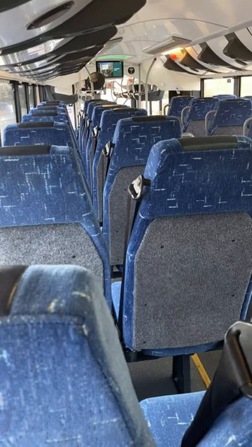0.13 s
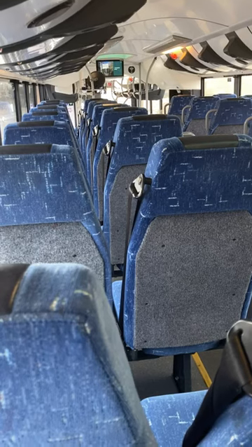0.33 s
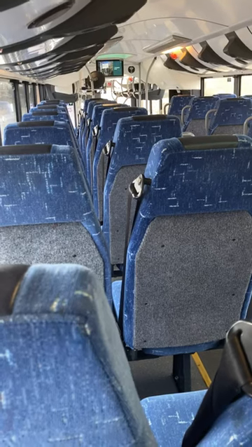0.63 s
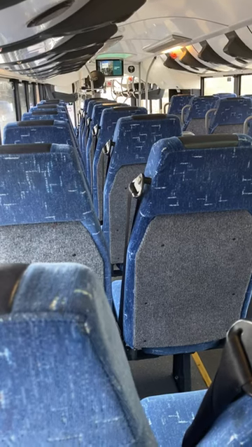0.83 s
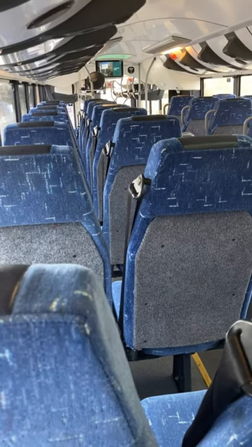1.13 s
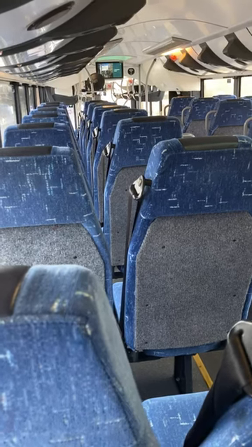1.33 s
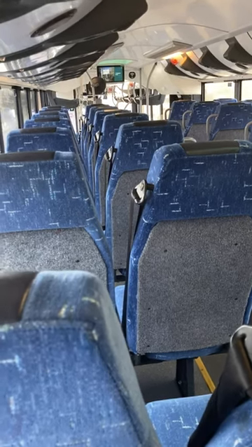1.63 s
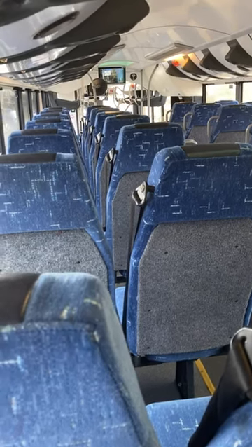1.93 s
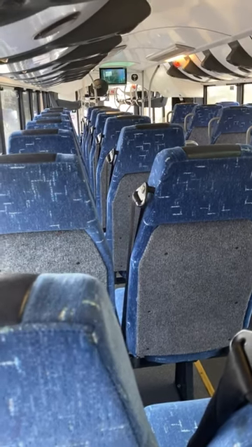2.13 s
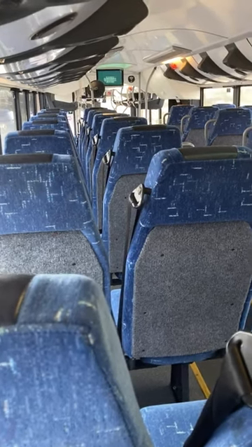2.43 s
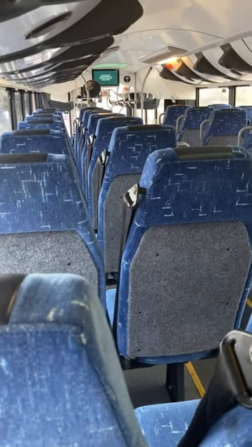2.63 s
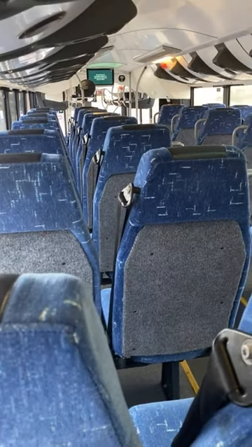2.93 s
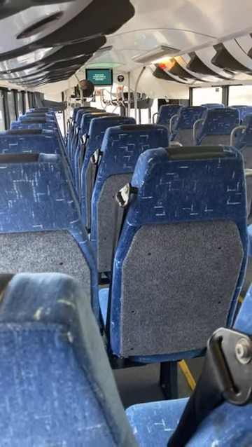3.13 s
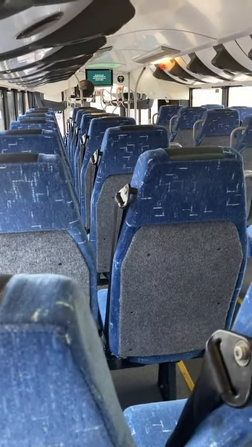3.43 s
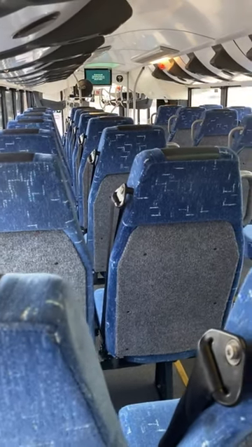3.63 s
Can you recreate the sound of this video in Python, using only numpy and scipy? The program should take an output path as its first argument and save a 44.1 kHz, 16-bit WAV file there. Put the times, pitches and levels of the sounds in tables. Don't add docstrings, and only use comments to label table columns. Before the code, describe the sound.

A low bus engine drone fills the cabin for about 3.8 seconds, its pitch dipping, rising around 1 second, then gradually sagging. A drive-line hum swells around 1.2 to 1.4 seconds, over continuous road rumble, soft hiss and very faint whine. Tiny buckle ticks appear early and from 2 seconds; bright metallic clacks cluster near 3.4 and 3.6. Bass leans left.

```python
import sys
import numpy as np
from scipy import signal
from scipy.fft import rfft, irfft, next_fast_len
from scipy.io import wavfile
from scipy.ndimage import uniform_filter1d

SR = 44100
rng = np.random.default_rng(int(sys.argv[2]) if len(sys.argv) > 2 else 0)


def decibels_to_gain(level_db):
    exponent = np.asarray(level_db, float) / 20
    return 10 ** exponent


def log_audio(samples):
    frames = np.atleast_2d(samples).T
    limited = np.clip(frames, -1, 1)
    pcm = np.round(limited * 32767).astype(np.int16)
    wavfile.write(sys.argv[1], SR, pcm)


N = 167139
T = np.arange(N) / SR
SIZE = next_fast_len(N + 4096)
HZ = np.maximum(np.arange(SIZE // 2 + 1) * SR / SIZE, 1)
GAP_LO_HZ, GAP_HI_HZ = 11150, 12500
# [f/Hz, width/Hz, gain/dB]
CABIN = [(55.3, 29, -3), (70.6, 13.1, 5.5), (91.9, 11, 3), (190, 11, 4), (251.4, 55.4, -4),
         (384.3, 13, 2.5), (520, 19, 3), (579, 16, 3.5), (960.5, 41, 7.5), (1150, 40, 6.5), (1338, 59, 6.5),
         (2630, 120, 3)]


def curve(table, col):
    a = np.array(table)
    return np.interp(T, a[:, 0], a[:, col])


def tone(table, hz, col=1):
    a = np.array(table)
    return np.interp(np.log(hz), np.log(a[:, 0]), a[:, col])


def peaks_db(table, hz):
    return sum(db / (1 + (2 * (hz - f) / w) ** 2) for f, w, db in table)


def walk(rate):
    k = int(SR / rate)
    held = np.repeat(rng.standard_normal(N // k + 1), k)
    return 1.322 * uniform_filter1d(uniform_filter1d(held, k), k)[:N]


def noise():
    return rfft(rng.standard_normal(SIZE))


def ports(shared, right_only, alike=None):
    # [f/Hz, left minus right/dB, likeness 0-1, left lead/rad]
    pair = [(60, 6, 0.88, 0.34), (130, 8, .995, -0.04), (178, 6, 0.97, 0.33), (254, 6.5, .88, -0.5),
            (346, 9.5, 0.6, -0.75), (500, 6.5, 0.6, -1.2), (690, 2.5, .72, -1.5), (1040, 2, .72, -2),
            (1390, 0, 0.2, -1.7), (1990, -0.2, 0, -2), (2840, 1.5, 0.69, -4), (4020, -0.5, 0.2, -4.5),
            (5600, 1, .5, -4), (9100, 0.5, 1, -5.5)]
    likeness = np.clip(tone(pair, HZ, col=2) if alike is None else alike, 0, 1)
    gain = decibels_to_gain(tone(pair, HZ, col=1) / 2)
    turn = np.exp(-1j * tone(pair, HZ, col=3))
    right = likeness * shared * turn + np.sqrt(1 - likeness ** 2) * right_only
    return np.array([shared * gain, right / gain])


def sine(hz, db):
    phase = 2 * np.pi * (np.cumsum(hz) / SR + rng.random())
    return np.sqrt(2) * decibels_to_gain(db + peaks_db(CABIN, hz)) * np.sin(phase)


def engine():
    # [t/s, firing f/Hz, exhaust boom level/dB, intake drone level/dB]
    revs = [(0, 100.6, -3.5, -16.5), (.2, 97.12, -5, 6.5), (.42, 93, -3.5, 8), (.68, 98.15, -5.5, 7),
            (.85, 102.2, -4, -6), (1.05, 105.7, -8.5, -4.5), (1.3, 102, -7, 2.5), (1.55, 98, -5, -7.5),
            (2.05, 97.13, 0, 5), (2.2, 95.73, 2.5, 5), (2.7, 94.1, 7, 2.5), (2.84, 92.12, -6.5, -4.5),
            (2.95, 94.5, 1, -7), (3.1, 94.5, 6.5, -2), (3.32, 90.5, -3, 3.5), (3.6, 93.2, 3.5, -2.5),
            (3.79, 93, 2, 9)]
    # [multiple of firing, level/dB, waver/dB, share of boom, share of drone]
    orders = [(.5, -35.5, 2.5, 0.084, -0.92), (.75, -38, 3.5, 0.36, 0.4), (1, -35.5, 4, 0.4, -0.14),
              (1.5, -48.5, 4.5, 0, 1), (2, -34, 1.13, 0.97, 0.27), (3, -41, 2, -0.18, -0.049),
              (4, -47, 2, 0.15, 1), (5, -59, 4.5, -0.92, -0.31), (6, -51, 2.5, 0.099, -0.11),
              (8, -61, 4, -1.2, -0.36)]
    firing = uniform_filter1d(curve(revs, col=1), size=4000) * (1 + 0.0021 * walk(12))
    boom, intake = curve(revs, col=2), curve(revs, col=3)
    out = 0
    for k, db, waver_db, boom_share, intake_share in orders:
        drift = 0.025 * walk(11) / (1 + k ** 3) + 0.0018 * (k > 2) * walk(20)
        level = db + boom_share * boom + intake_share * intake + waver_db * walk(8)
        out = out + sine(k * firing * (1 + drift), level)
    return out


def drive_line():
    # [t/s, f/Hz, level/dB]
    hum = [(0, 202, -38.5), (.45, 190, -45), (.9, 213, -45.5), (1.15, 229, -31.5), (1.38, 233, -29),
           (1.6, 220, -35), (1.9, 204, -37), (2.2, 197, -37), (2.7, 190, -48.5), (3.2, 180, -34),
           (3.5, 184, -37), (3.79, 186, -39)]
    hz = uniform_filter1d(curve(hum, col=1), size=4000)
    return sine(hz * (1 + 0.0029 * walk(8)), curve(hum, col=2) + 1.6 * walk(10))


def rattles():
    # [t/s, level/dB, length/s, brightest f/Hz, body level/dB]
    knocks = [(0.119, -63.5, 0.015, 7940, -2.5), (0.406, -68, 0.008, 9000, 0.5),
              (1.955, -61.5, 0.009, 8062, 1), (2.011, -66.5, 0.033, 8340, -4),
              (2.057, -69, 0.041, 8300, -2.5), (2.126, -69, .035, 8355, -6.5),
              (2.326, -71, 0.025, 8500, -3), (2.373, -68.5, 0.038, 8300, -3),
              (2.625, -69, 0.017, 8550, -1.5), (2.7204, -58.5, .013, 8000, 0),
              (2.955, -63.5, 0.012, 9000, 0.5), (3.211, -65, 0.0088, 8540, 1),
              (3.3533, -63, 0.0028, 9130, -3), (3.359, -59, 0.0027, 9100, 1),
              (3.367, -51.5, 0.0045, 8360, -1.5), (3.3717, -39, 0.0067, 8510, -5.5),
              (3.386, -44.5, 0.01, 9219, 1), (3.403, -43, 0.009, 9460, 1.5), (3.418, -50, .008, 7850, -1.5),
              (3.5604, -45.5, 0.0064, 7810, -7), (3.567, -51, .008, 7560, -6.5),
              (3.586, -61.5, .06, 8000, -1), (3.659, -59, .003, 7700, -2), (3.6696, -48, .013, 7620, -4.5)]
    # [f/Hz, level/dB per Hz]
    colour = [(1520, -23.5), (2550, -17.5), (4400, -7), (6100, -7), (8300, -14), (10700, -11), (13000, -13),
              (15700, -19)]
    # [f/Hz, width/Hz, gain/dB]
    buckle = [(2570, 120, 13.5), (2650, 110, 11.5), (3200, 310, 8), (5760, 110, 7), (6760, 66, 7),
              (7700, 53, 4), (8500, 80, 6.5), (9650, 91, 3)]
    attack_s, release_s, tail_s, tail_db = 0.00052, 0.012, 0.046, -13.5
    ring_width_hz, ring_db, edge_per_db, chatter_db = 1600, 7.5, 0.15, 1.5
    lag_s, lean_rad = 0.00017, 2.9
    size, lead = 16384, 256
    u = np.arange(size) / SR
    hz = np.maximum(np.arange(size // 2 + 1) * SR / size, 1)
    lean = np.exp(np.array([[0.5j], [-0.5j]]) * (2 * np.pi * hz * lag_s - lean_rad))
    out = np.zeros((2, N + size))
    for s, db, length, ring_hz, body_db in knocks:
        rise = decibels_to_gain(db) * np.clip(u / attack_s, 0, 1)
        after = np.maximum(u - length, 0)
        body = body_db * np.clip(6000 / hz - 1, 0, 1) ** 0.5
        edge = edge_per_db * (db + 43.5) * (hz > GAP_LO_HZ)
        modes = buckle + [(ring_hz, ring_width_hz, ring_db)]
        shape = decibels_to_gain(tone(colour, hz) + peaks_db(modes, hz) + body + edge)
        shape = shape / np.sqrt(np.mean(shape ** 2))
        hit = rng.standard_normal((5, size)) * decibels_to_gain(chatter_db * walk(460)[:size])
        direct = (hit[0] + np.array([[0.25], [-0.25]]) * hit[1]) * np.exp(-after / release_s)
        tail = decibels_to_gain(tail_db) * np.exp(-after / tail_s) * (hit[2] + 0.5 * hit[3:])
        knock = irfft(rfft(rise * (direct + tail)) * lean * shape, size)
        at = int(s * SR) - lead
        out[:, at:at + size] += np.roll(knock, lead, axis=1)
    return out[:, :N]


def squeak():
    at_s, length_s, hz, db = 2.575, 0.02, 4030, -64
    return decibels_to_gain(db) * np.exp(-((T - at_s) / length_s) ** 2) * np.sin(2 * np.pi * hz * T)


def road():
    # [f/Hz, level/dB per Hz]
    rumble = [(21, -25.5), (34, -7.5), (48, -0.5), (61, 0.5), (112, -3.5), (172, -6.5), (305, -18.5),
              (610, -25), (1010, -36.5)]
    # [f/Hz, level/dB per Hz]
    hiss = [(1010, -34), (1650, -41), (2650, -48), (3400, -52.5), (4600, -60), (5600, -66), (9500, -73),
            (11000, -74.5), (12700, -96.5), (13300, -82.5), (14700, -85.5), (15600, -102)]
    # [f/Hz, width/Hz, gain/dB]
    panels = [(620, 12, 2), (795, 45, 0.5), (1498, 53, 4), (1924, 60, 6.5), (2220, 100, 5), (2422, 83, 8),
              (2790, 77, 8), (3270, 60, -2.5), (4010, 190, 3)]
    # [t/s, level below about 300 Hz/dB, brightness mainly at 350-1500 Hz/dB]
    surface = [(0, -1.5, -2), (.4, -3, -3), (.8, -4, 0), (1.2, -0.5, 3), (1.6, -4.5, 1), (2, -2.5, 0.5),
               (2.5, -3, 0.5), (2.9, -3.5, -0.5), (3.2, -2.5, 1), (3.45, -2.3, 0), (3.65, -0.5, 1.1),
               (3.79, -1, 3.5)]
    road_db, flicker_db, swell_db = -22, 1.75, 0.3
    ripple_db, ripple_hz = 1.3, 30
    shape = decibels_to_gain(tone(rumble[:-1] + hiss, HZ) + peaks_db(CABIN + panels, HZ))
    width = int(ripple_hz * SIZE / SR)
    ripple = uniform_filter1d(uniform_filter1d(rng.standard_normal(len(HZ)), width), width)
    shape = shape * decibels_to_gain(ripple_db * ripple / np.std(ripple) * np.clip(HZ / 600 - 1, 0, 1))
    spec = ports(noise(), noise()) * shape
    spec = spec * decibels_to_gain(road_db) / np.std(irfft(spec.mean(axis=0), SIZE))
    swell, rough, bright = walk(1.6), curve(surface, col=1), curve(surface, col=2)
    out = 0
    for k in range(21):
        place = 2 * np.log2(HZ / 20) - k
        band = irfft(spec * np.cos(np.clip(place, -1, 1) * np.pi / 2) ** 2, SIZE)[:, :N]
        low = np.clip(4 - k / 2, 0, 1)
        high = np.clip(k / 2 - 3.1, 0, 1) * np.clip(7.2 - k / 2, 0.15, 1)
        out = out + band * decibels_to_gain(low * rough + high * bright + swell_db * swell + flicker_db * walk(9))
    return out


def fan():
    # [f/Hz, level/dB]
    whines = [(1857, -62), (969, -67)]
    return sum(sine(f * (1 + 0.001 * walk(14)), db + 2.5 * walk(10)) for f, db in whines)


def scene():
    machine = engine() + drive_line() + fan()
    tones = irfft(ports(rfft(machine, SIZE), 0, alike=0.86), SIZE)[:, :N]
    return tones + rattles() + squeak() + road()


def band_limit(x):
    return signal.sosfilt(signal.butter(12, 15750, fs=SR, output="sos"), x)


def record(dry):
    soft_clip, gap_db = 1.6, -35
    gap = np.where((HZ > GAP_LO_HZ) & (HZ < GAP_HI_HZ), decibels_to_gain(gap_db), 1)
    x = np.tanh(soft_clip * dry) / soft_clip
    x = np.hstack([x, np.linspace(x[:, -1], x[:, 0], SIZE - N, axis=1)])
    x = irfft(rfft(x) * gap, SIZE)[:, :N]
    return band_limit(x)


dry = scene()
out = record(dry)
log_audio(out)
```